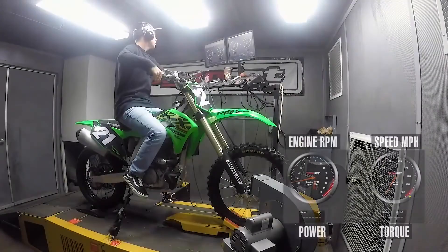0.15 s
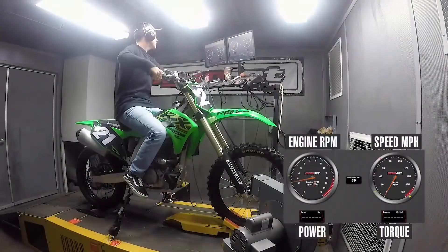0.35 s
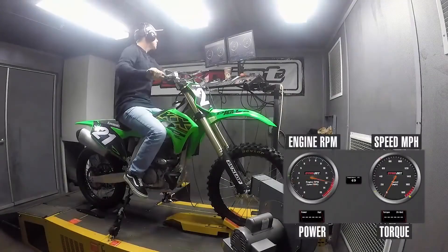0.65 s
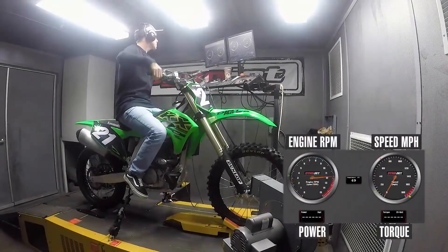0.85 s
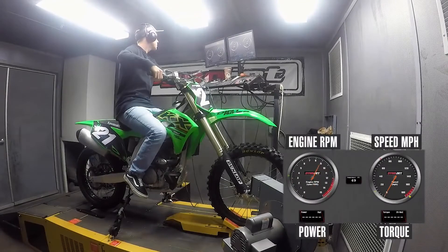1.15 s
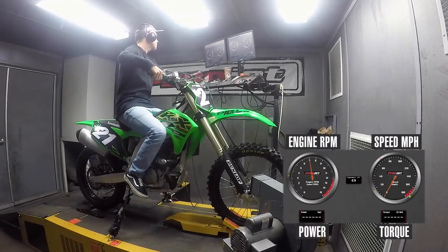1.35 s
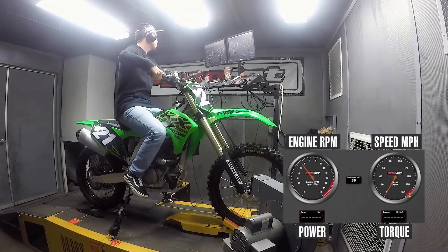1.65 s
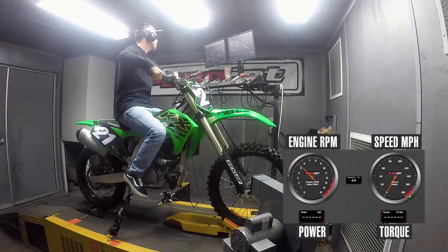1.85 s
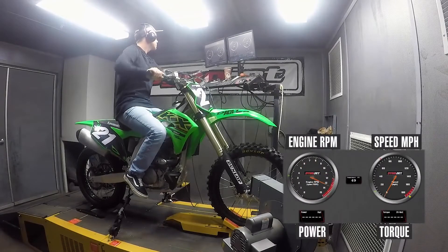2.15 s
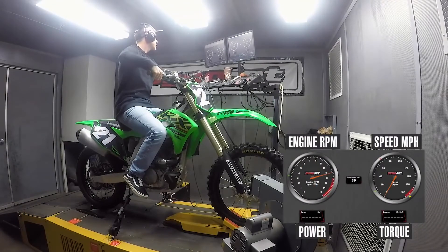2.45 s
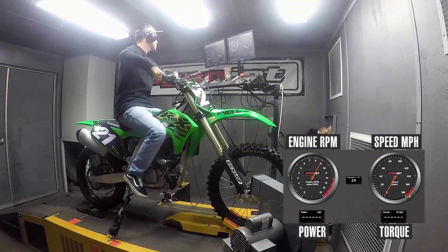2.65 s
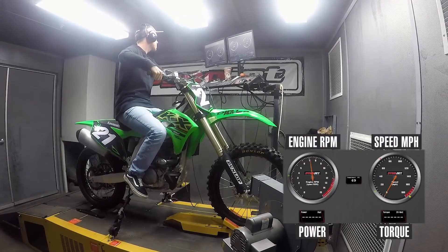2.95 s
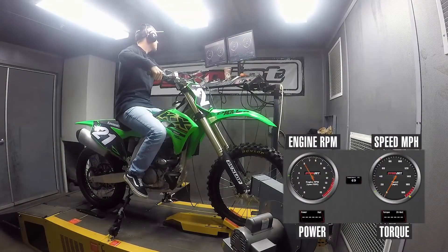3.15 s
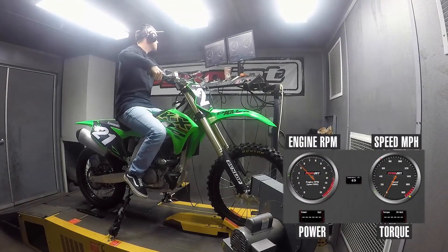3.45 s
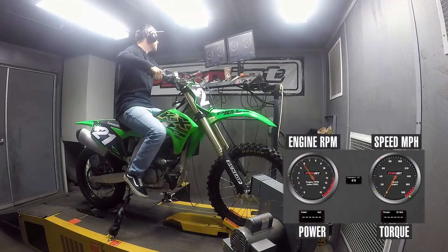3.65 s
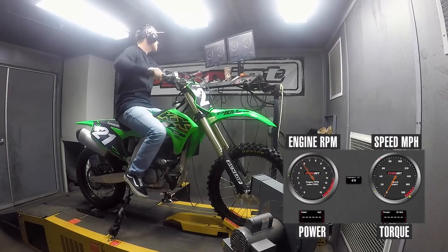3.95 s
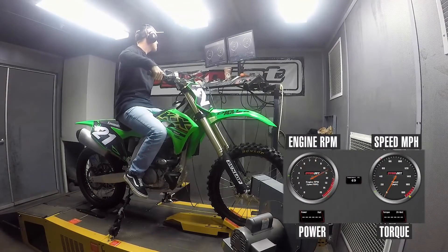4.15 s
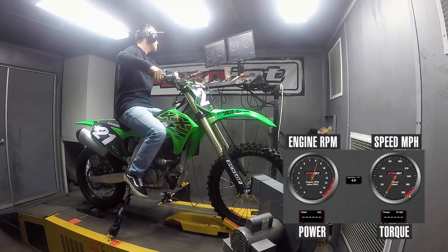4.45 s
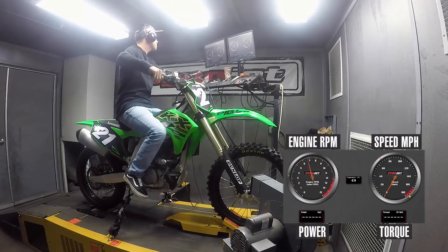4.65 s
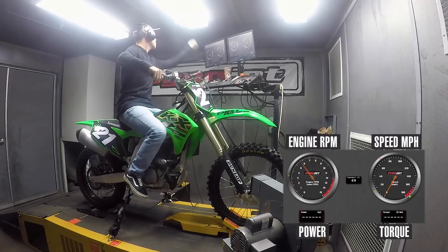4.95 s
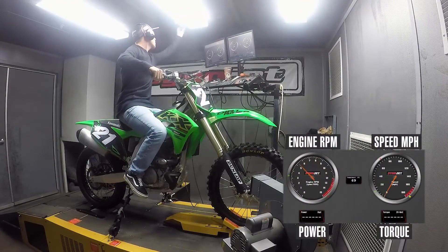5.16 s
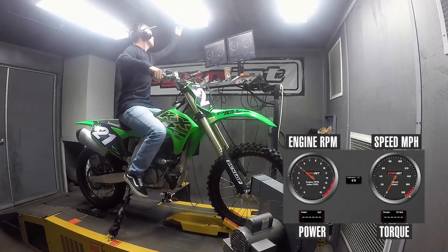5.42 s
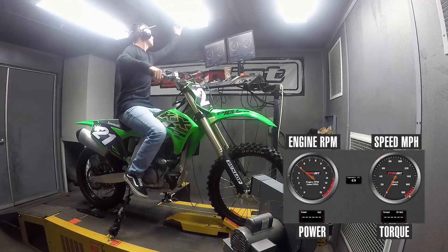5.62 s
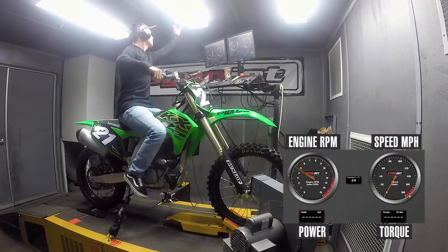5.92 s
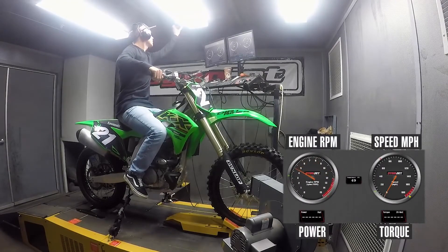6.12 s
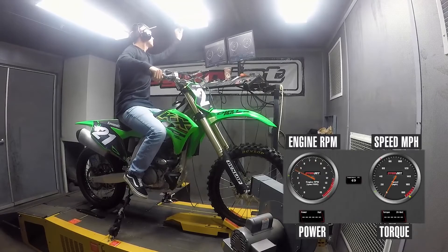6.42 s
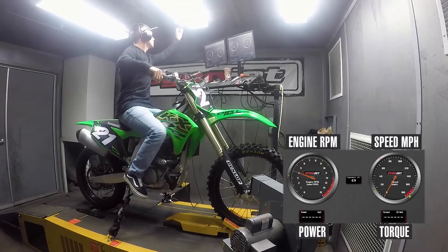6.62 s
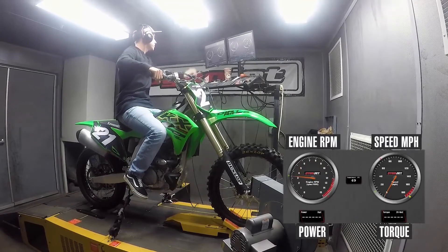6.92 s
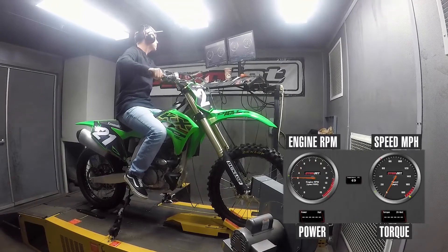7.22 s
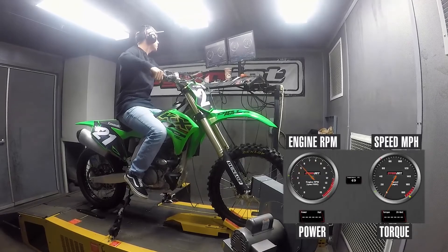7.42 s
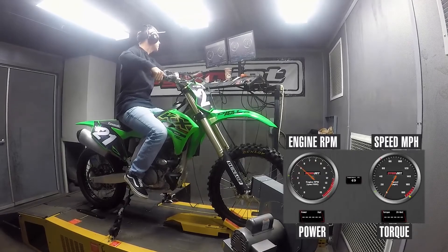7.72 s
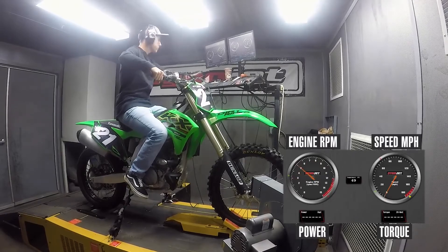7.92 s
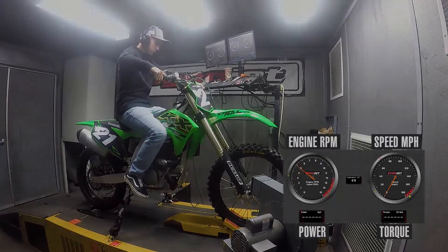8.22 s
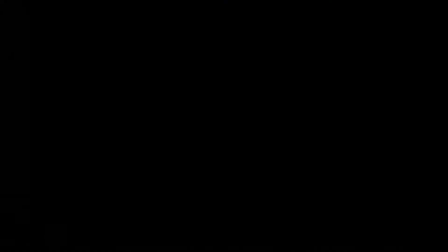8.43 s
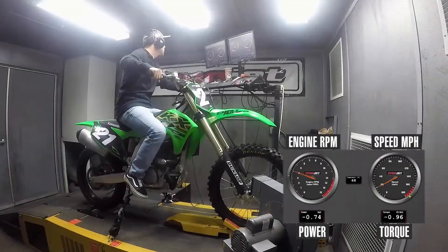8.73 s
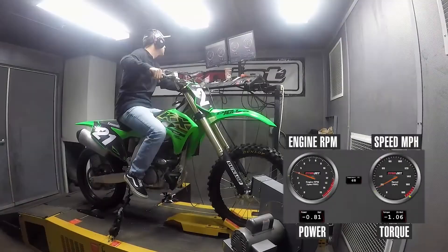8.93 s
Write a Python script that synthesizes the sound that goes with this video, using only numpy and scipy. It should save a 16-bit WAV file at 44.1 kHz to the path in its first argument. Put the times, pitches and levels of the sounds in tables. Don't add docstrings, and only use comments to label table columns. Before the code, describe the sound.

A single-cylinder four-stroke dirt bike thumps at a low idle in a small hard-walled booth. Three quick throttle blips crack and bark upward, each winding down with a clean, hollow pipe tone. It then idles unevenly, sags almost to a stall and is caught by a small blip. Finally the sound cross-fades into a slower idle. A small nearby microphone gives a close, slightly dull and thin-bottomed sound with short reflections.

```python
import sys
import numpy as np
from scipy import signal
from scipy.io import wavfile
from scipy.ndimage import uniform_filter1d

SR = 44100
rng = np.random.default_rng(int(sys.argv[2]) if len(sys.argv) > 2 else 0)


def nominal_scale(level):
    x = np.asarray(level, float) / 20
    return 10 ** x


def unload_audio(sound):
    columns = np.transpose(np.atleast_2d(sound))
    steps = np.round(np.clip(columns, -1, 1) * 32767)
    wavfile.write(sys.argv[1], SR, steps.astype(np.int16))


N = 400428
TICK_LEAD, TICK_T_S = 0.15, 0.0049


def in_time(rows):
    s, *columns = np.transpose(rows)
    return [np.interp(np.arange(N) / SR, s, c) for c in columns]


def evened(x):
    power = uniform_filter1d(uniform_filter1d(x ** 2, size=4000), size=4000)
    return x / np.sqrt(power + 1e-12)


def resonate(x, modes):
    out = 0
    for k, (hz, width, db) in enumerate(modes):
        r = np.exp(-np.pi * width / SR)
        a = [1, -2 * r * np.cos(2 * np.pi * hz / SR), r * r]
        ring = signal.lfilter([(1 - r * r) / 2, 0, (r * r - 1) / 2], a, x)
        out = out + (-1) ** k * nominal_scale(db) * ring
    return out


def band(x, low_hz, high_hz):
    return signal.sosfilt(signal.butter(3, [low_hz, high_hz], "band", fs=SR, output="sos"), x)


def cut(x, cuts, depth=1):
    for hz, width, share in cuts:
        x = x - depth * np.clip(share, 0, 1) * resonate(x, [(hz, width, 0)])
    return x


def fading(hits, t_s):
    return signal.lfilter([1], [1, -np.exp(-1 / (t_s * SR))], hits)


def clicks(at, size):
    out, i = np.zeros(N), at.astype(int)
    out[i] = size * (1 + i - at)
    out[i + 1] += size * (at - i)
    return out


def booth(x, wet_db=-7):
    t = np.arange(SR // 3) / SR
    t60_s = .16
    tail = rng.standard_normal(len(t)) * nominal_scale(-60 * t / t60_s) * (t > .004)
    return x + nominal_scale(wet_db) * signal.fftconvolve(x, tail / np.sqrt(np.sum(tail ** 2)))[:N]


# (time [s], engine cycles per second [Hz])
IDLE_SPEED = [
    (0, 20),
    (.44, 19.8),
    (5.78, 40.1),
    (6.43, 35.7),
    (6.68, 32.6),
    (6.85, 29.3),
    (7.03, 24.5),
    (7.22, 22.1),
    (8.36, 40.3),
]
# (opens [s], pull ends [s], speed there [Hz], top [s], top speed [Hz])
BLIPS = [
    (.455, .72, 100.5, .79, 111.5),
    (2.02, 2.28, 116.4, 2.31, 121),
    (3.65, 3.91, 111.5, 3.96, 120.5),
    (7.24, 7.31, 41, 7.4, 47.6),
]
# (time [s], speed [Hz])
RUN_DOWN = [
    (-.03, 123.2),
    (.21, 100.6),
    (.62, 63.7),
    (.81, 54.2),
    (.93, 50),
    (1.07, 46.4),
    (1.2, 44.3),
    (1.35, 42.8),
]


def speed_points():
    points = list(IDLE_SPEED)
    down_s, down_hz = np.transpose(RUN_DOWN)
    for opens, pull_s, pull_hz, top_s, top_hz in BLIPS:
        s, hz = np.transpose(sorted(points))
        found_hz = np.interp(opens, s[s < opens + .3], hz[s < opens + .3])
        points = [p for p in points if not opens <= p[0] < opens + .3]
        points += [(opens, found_hz), (pull_s, pull_hz), (top_s, top_hz)]
        joined = top_s - np.interp(-top_hz, -down_hz, down_s)
        points += [(joined + a, b) for a, b in RUN_DOWN if b < top_hz]
    return sorted(points)


# (start [s], end [s])
COASTING = [
    (.79, 1.44),
    (2.341, 3.08),
    (3.989, 4.72),
]


def states(late):
    coast = sum(in_time([(a - .03, 0), (a + .03, 1), (b - .06, 1), (b + .06, 0)])[0] for a, b in COASTING)
    opened = 0
    for a, b, *_ in BLIPS:
        start, shut = a - .023, b + .0033
        opened = opened + in_time([(start, 0), (start + .066, 1), (shut, 1), (shut + .12, 0)])[0]
    shares = np.array([np.clip(1 - opened - coast, 0, 1) * (1 - late), opened, coast, late])
    return shares / shares.sum(axis=0)


def by_state(speed, shares, tables):
    columns = [np.transpose(rows) for rows in tables]
    return sum(share * np.array([np.interp(speed, c[0], v) for v in c[1:]])
               for share, c in zip(shares, columns))


# (speed [Hz], chance per cycle [dB], weak second cycle [dB], turbulence [0-1],
# crank hum [share], valve tick [share])
IDLE_BURN = [(20, .7, 5.5, .12, 0, 1.2), (23.5, 1.5, 0, .28, .4, 1), (27, 3, 4, .3, .6, .3),
             (29.5, 3, 5, .3, 1.6, .3), (32, 2, 7, .25, 1.3, .4), (38.5, 2, 7, .25, 1.2, .4),
             (40, 1.5, 3.5, .2, 1.3, .35), (42.3, 1.2, 3, .2, 1.6, .3), (43.5, 3, 2.5, .3, 2, .3),
             (54, 3.5, 2.5, .3, 1.5, .3)]
OPEN_BURN = [(30, 1.5, 0, .48, 0, 1.2), (41, 1.2, 0, .48, 0, 1.5), (48, 1.2, 0, .48, 0, .8),
             (60, 1, 0, .5, 0, .6), (110, 1, 0, .55, 0, .8)]
COAST_BURN = [(60, .6, 0, .13, 1.2, .15), (66, .5, 0, .11, .25, .15), (106, .5, 0, .1, 0, .15),
              (113, .6, 0, .12, 0, .15), (119, 2.5, 5, .26, 0, .15)]
LATE_BURN = [(33, 1.5, 3, .3, .9, .25)]


def combustion(speed, shares):
    return by_state(speed, shares, [IDLE_BURN, OPEN_BURN, COAST_BURN, LATE_BURN])


# (speed [Hz], silencer thud [dB], header knock [dB], outlet bark [dB], casing hiss [dB])
IDLE_DB = [(19.9, -10.5, -15.5, -23.5, -38.5), (20.8, -11, -11, -21, -39), (27.2, -7, -17, -23, -34),
           (34.5, -12.5, -12.5, -22, -38), (41.16, -10.5, -13.5, -21.5, -35.5),
           (42.2, -10, -13.5, -24, -37), (44.8, -13, -17, -26, -39), (57.6, -11, -14, -25, -40)]
OPEN_DB = [(25, -13, -8, -13, -33), (42.7, -13.5, -13.5, -15, -39), (63, -10.5, -7, -11.5, -33.5),
           (66.6, -10, -12.5, -11, -27.5), (91.3, -25, -8, -15.5, -25), (101.8, -11, -17, -10.5, -27),
           (116, -13, -11, -10.5, -26)]
COAST_DB = [(60.8, -13, -15.5, -21.5, -37.5), (65.4, -21.5, -11.5, -19, -38),
            (72, -19.5, -16.5, -15.5, -34.5), (93.2, -19, -16, -18.5, -33), (101, -16, -18, -15, -32.5),
            (111.3, -20, -17, -18.5, -27.5), (114.6, -13, -15.5, -14, -27.5)]
LATE_DB = [(33, -14, -11, -21.5, -38)]


def loudness(speed, shares, late):
    dip_db = -2 * np.sin(2 * late) * [[1], [1], [.5], [0]]
    return by_state(speed, shares, [IDLE_DB, OPEN_DB, COAST_DB, LATE_DB]) + dip_db


def cylinder(speed, beats, chance_db, weak_db):
    t = np.arange(N) / SR
    cycles = np.cumsum(in_time(speed)[0]) / SR
    at_beat = np.interp(beats, t, cycles)
    whole = np.round(at_beat[0]) + np.cumsum(np.round(np.diff(at_beat, prepend=at_beat[0])))
    cycles += np.interp(t, beats, whole - at_beat)
    count = np.arange(np.ceil(cycles[0]), np.floor(cycles[-1]))

    def sample_at(c):
        return np.interp(c, cycles[:-1], np.arange(N - 1.))

    at = sample_at(count)
    i = at.astype(int)
    since_beat = count - whole[np.maximum(np.searchsorted(whole, count, "right") - 1, 0)]
    size_db = chance_db[i] * rng.standard_normal(999)[:len(i)] * np.where(since_beat, 1, .3)
    size_db += 1.5 * (since_beat == 0) - weak_db[i] * (since_beat % 2)
    size = nominal_scale(size_db)
    valve = clicks(sample_at(count - TICK_LEAD), np.sqrt(size))
    hum = np.sin(4 * np.pi * cycles + 1.8)
    return np.array([clicks(at, size), valve, hum, clicks(sample_at(count + .5), size)])


BEATS = [0.010, .110, 0.410, 0.458, 0.495, 0.524, .619, 0.646, 2.039, 2.06, 2.099, 2.129, 2.157, 2.181,
         2.212, 3.671, 3.695, 5.18, 5.436, 5.484, 5.556, 5.653, 5.752, 5.802, 5.877, 5.903, 5.954, 6.006,
         6.113, 6.221, 6.331, 6.442, 6.558, 6.678, 6.743, 6.774, 6.808, 6.91, 6.988, 7.071, 7.162, 7.209,
         7.252, 7.286, 7.315, 7.563, 7.884, 8.098, 8.147, 8.195, 8.221, 8.269, 8.317, 8.367]
LATE_BEATS = [
    8.593,
    8.651,
    8.711,
    8.771,
    8.831,
    8.892,
    8.952,
    9.012,
]
# (time [s], speed [Hz])
LATE_SPEED = [
    (8.55, 33.72),
    (8.7, 33.7),
    (9.08, 33.16),
]


def both_idles(late, firing):
    early_run = cylinder(speed_points(), BEATS, *firing)
    late_run = cylinder(LATE_SPEED, LATE_BEATS, *firing)
    return np.cos(late) * early_run + np.sin(late) * late_run


def gas_rush(pulses, turbulence, throttle, noise):
    return turbulence * (1 - .7 * throttle) * evened(noise * (.5 + evened(fading(pulses, .012))))


# (frequency [Hz], width [Hz], level [dB])
THUD = [(105.9, 7.2, 2.5), (74, 22.3, -11)]
# (frequency [Hz], width [Hz], level [dB])
RUMBLE = [(37.5, 26.4, -1), (69.5, 23.6, -3.5)]


def silencer_thud(gas, rush, hum, hum_share, coast):
    thud = evened(band(resonate(gas + rush, THUD), low_hz=50, high_hz=600)) + 1.3 * hum_share * hum
    return thud + 0.27 * hum_share * (1 - coast) * evened(resonate(rush, RUMBLE))


# (frequency [Hz], width [Hz], level [dB])
KNOCK = [(137.8, 12.7, 7.5), (161.5, 10.6, 10), (195, 28.7, 10.5), (271, 52, 6), (324.6, 29, 6.5),
         (371, 27, -11.5), (346, 36.5, -0.5), (263.6, 18, 0.5), (132.5, 11, 3)]
# (frequency [Hz], width [Hz], level [dB])
SLOW_KNOCK = [(169, 40, -3.5), (207.3, 25, 0), (258.5, 48, -0.5), (333, 51, 0.5)]
# (frequency [Hz], width [Hz], removed [share])
HEADER_CUTS = [(150, 20, .05), (221.5, 20.4, 0.52), (298, 52, 0.62), (248, 39, 0.51)]
SLOW_CUTS = [(370, 76, 0.97)]
OUTLET_CUTS = [(438, 130, 0.47), (517, 18, .5), (454, 24, 0.58), (906, 18, 0.66), (1070, 26, .7),
               (1240, 45, .6), (1163, 25, 0.55)]


def header_knock(gas, rush, cold, throttle, slow, coast):
    header = (1 - slow) * resonate(gas + .5 * rush, KNOCK) - slow * resonate(gas, SLOW_KNOCK)
    header = cut(header, HEADER_CUTS, (1 - throttle) * (1 - slow))
    header = cut(cut(header, SLOW_CUTS, slow), OUTLET_CUTS)
    knock = (1 - coast) * evened(band(header, low_hz=115, high_hz=425))
    return knock + coast * evened(band(cold, low_hz=128, high_hz=345))


# (frequency [Hz], width [Hz], level [dB])
BARK = [(459, 310, 2), (565.6, 104, 7), (736.4, 52, -7), (921, 36, -4), (966.6, 14.6, -3),
        (1175, 130, -9.5)]


def outlet_bark(gas, rush, cold, throttle, slow, coast, noise):
    closed = 1 - throttle
    outlet = gas + closed * (1 - slow) * (booth(gas, 1.0) - gas) + 2.6 * rush + .5 * closed * noise
    slap_s = .012
    outlet += nominal_scale(-6.5) * closed * np.interp(np.arange(N) - slap_s * SR, np.arange(N), gas)
    outlet = cut(outlet, OUTLET_CUTS, closed)
    ring = resonate(outlet, BARK) - 0.64 * throttle * resonate(outlet, BARK[:2])
    bark = (1 - coast) * evened(band(ring, low_hz=460, high_hz=1267))
    return bark + coast * evened(band(cold, low_hz=362, high_hz=2460))


# (frequency [Hz], width [Hz], level [dB])
SEAT = [(3126, 270, 0), (4630, 1700, -9.5), (6700, 1100, -10), (9200, 990, -20)]


def valve_ticks(valve, noise):
    return evened(resonate(noise * fading(valve, TICK_T_S) + 2.5 * valve, SEAT))


# (frequency [Hz], width [Hz], level [dB])
CASING = [(1300, 416, -6), (1403, 33, 0.5), (1652, 10, -10.5), (1874, 114, -2.5), (2077, 134, -10.5),
          (3100, 68, -12), (3200, 70, -11.5), (3820, 660, -16.5), (4640, 1280, -22), (6810, 1180, -20.5),
          (9400, 9000, -29.5)]
# (frequency [Hz], width [Hz], removed [share])
CASING_CUTS = [(2540, 510, 0.38), (5470, 360, 0.45), (10460, 3300, 0.99)]


def casing_hiss(noise, ticks, crack, cold, tick_share, throttle, coast, fast):
    hiss = (1 - 0.18 * coast * fast) * evened(resonate(noise, CASING))
    hiss += 0.39 * tick_share * ticks + 1.2 * throttle * crack
    hiss += (1.0 + 0.55 * fast) * coast * evened(band(cold, low_hz=1160, high_hz=2570))
    hiss = cut(hiss, CASING_CUTS, (1 - throttle) * (1 - fast))
    return evened(band(hiss, low_hz=1195, high_hz=9700))


def floor_shake(noise):
    return nominal_scale(-50) * evened(band(noise, low_hz=22, high_hz=63.5))


# (frequency [Hz], width [Hz], level [dB])
CRACK = [(1500, 390, 3.5), (2320, 1600, -5.5), (3360, 560, -2)]


def charge_crack(pulses, fast, noise):
    crack = evened(resonate(14.0 * pulses + noise * (fading(pulses, .0015) + .2), CRACK))
    return evened(crack + 1.8 * fast ** 2 * (booth(crack, 0) - crack)) * (0.6 + .95 * np.sqrt(fast))


def treble_hiss(fast, noise):
    return nominal_scale(-24) * np.sqrt(fast) * evened(resonate(noise, [(10500, 8700, 0)]))


# (frequency [Hz], width [Hz], level [dB])
COLD_PIPE = [(153, 75, -11), (217, 93, 1.5), (317, 58, 3.5), (451, 25.3, 1), (465, 70.4, -1.5),
             (586, 55.5, 4), (747, 65.7, 0.5), (875, 29.4, 0.5), (988, 42, -1), (1130, 58, -15.5),
             (1190, 114, -26), (1890, 760, -35.5), (384.6, 11.6, -7), (1216, 62, -16)]
# (frequency [Hz], width [Hz], removed [share])
COLD_CUTS = [(166.3, 33, 0.94), (407, 16, 0.25), (1047, 64, 0.58), (930, 28, .6), (1000, 17, 0.33)]


def cold_pipe(gas, idle_stroke, hum, fast):
    ring = evened(cut(resonate(gas + .4 * fast * evened(idle_stroke), COLD_PIPE), COLD_CUTS))
    second, third = 1 - 2 * hum ** 2, 3 * hum - 4 * hum ** 3
    return ring + fast * (.8 * second + .3 * third)


def slack_clack(noise):
    clack_s = 2.056
    clack = fading(clicks(np.array([clack_s * SR]), 0.72), TICK_T_S)
    return nominal_scale(-37.5) * 20 * resonate(noise * clack, SEAT)


# (start [s], end [s])
FADE_S = (8.3, 8.62)


def scene():
    late = np.interp(np.arange(N) / SR, FADE_S, [0, np.pi / 2])
    speed, shares = in_time(speed_points())[0], states(np.sin(late) ** 2)
    *firing, turbulence, hum_share, tick_share = combustion(speed, shares)
    thud_db, knock_db, bark_db, hiss_db = loudness(speed, shares, late)
    pulses, valve, hum, idle_stroke = both_idles(late, firing)

    coast = shares[2]
    throttle = np.clip((turbulence - .32) / .2, 0, 1)
    slow, fast = np.clip((30 - speed) / 7, 0, 1), np.clip((speed - 60) / 45, 0, 1)
    flow_noise, seat_noise, casing_noise, crack_noise = rng.standard_normal((4, N))

    rush = gas_rush(pulses, turbulence, throttle, flow_noise)
    gas = booth(evened(pulses) + rush)
    cold = cold_pipe(gas, idle_stroke, hum, fast)
    gas = signal.sosfilt(signal.butter(2, 1620, fs=SR, output="sos"), gas)

    thud = silencer_thud(gas, rush, hum, hum_share, coast)
    knock = header_knock(gas, rush, cold, throttle, slow, coast)
    bark = outlet_bark(gas, rush, cold, throttle, slow, coast, casing_noise)
    ticks = valve_ticks(valve, seat_noise)
    crack = charge_crack(pulses, fast, crack_noise)
    hiss = casing_hiss(casing_noise, ticks, crack, cold, tick_share, throttle, coast, fast)
    hiss += treble_hiss(fast, crack_noise)

    out = nominal_scale(thud_db) * evened(thud) + nominal_scale(knock_db) * knock + nominal_scale(bark_db) * bark + nominal_scale(hiss_db) * hiss
    out += floor_shake(seat_noise) + slack_clack(seat_noise)
    first, pair = int(BEATS[0] * SR), int((BEATS[1] - BEATS[0]) * SR)
    out[:first] = out[pair:pair + first]
    return out[None]


def roll_off(x):
    return signal.sosfilt(signal.butter(12, 15700, fs=SR, output="sos"), x)


def record(dry):
    run_in, ceiling = 300, 1.08
    x = np.concatenate([dry[:, run_in:0:-1], dry], axis=1)
    x = signal.sosfilt(signal.butter(9, 10400, fs=SR, output="sos"), x)
    x = signal.sosfilt(signal.butter(2, 28.2, "high", fs=SR, output="sos"), x)[:, run_in:]
    mix = ceiling * np.tanh(x / ceiling)
    return roll_off(mix)


dry = scene()
out = record(dry)
unload_audio(out)
```